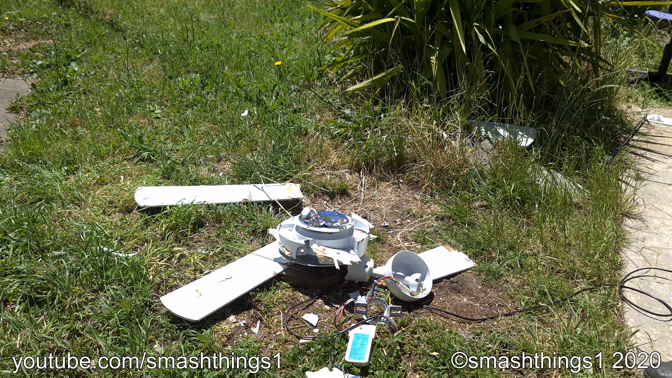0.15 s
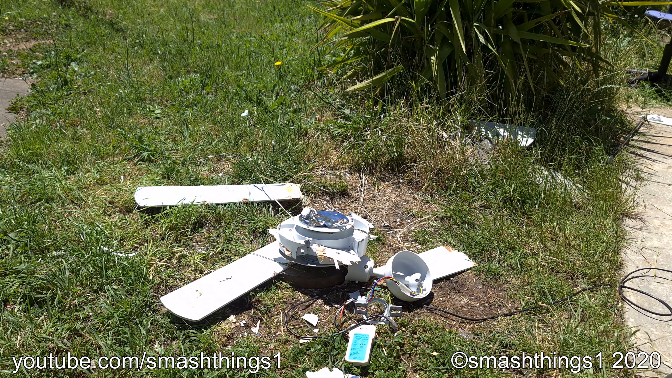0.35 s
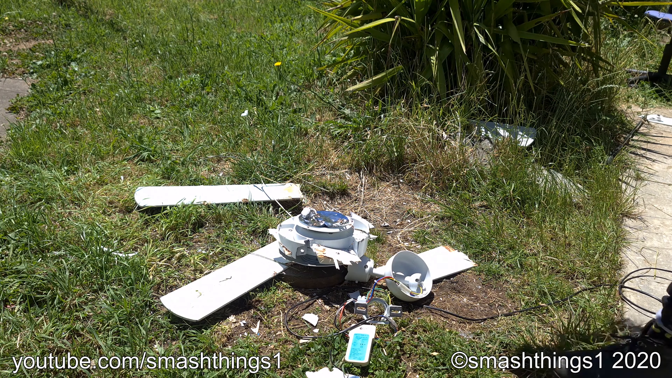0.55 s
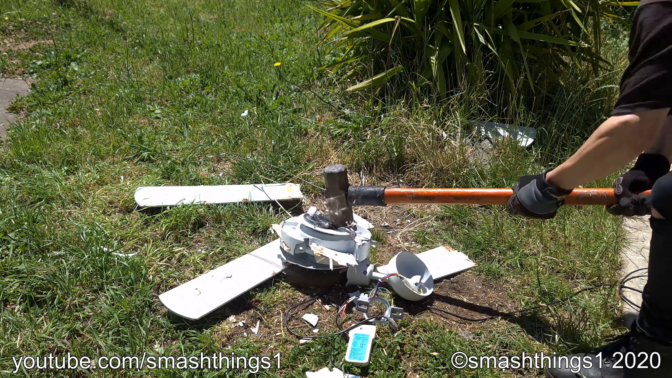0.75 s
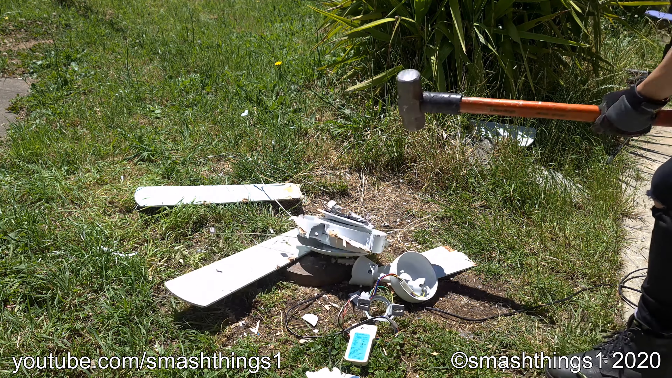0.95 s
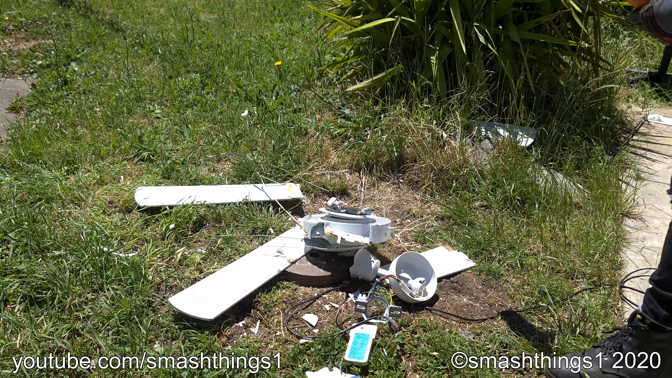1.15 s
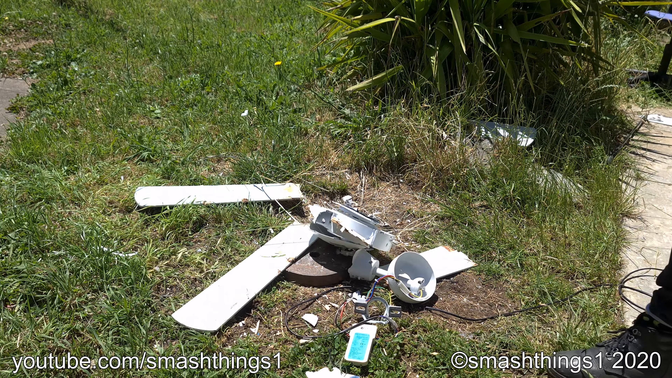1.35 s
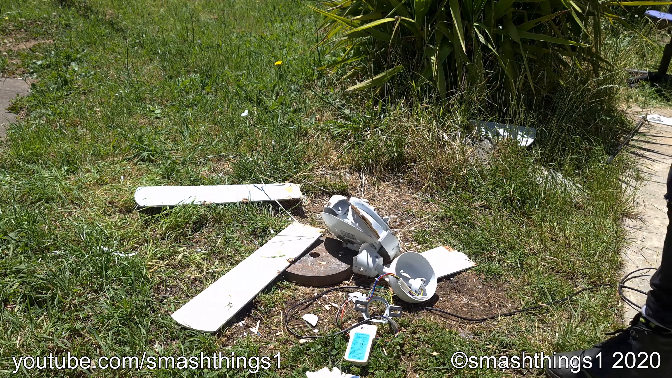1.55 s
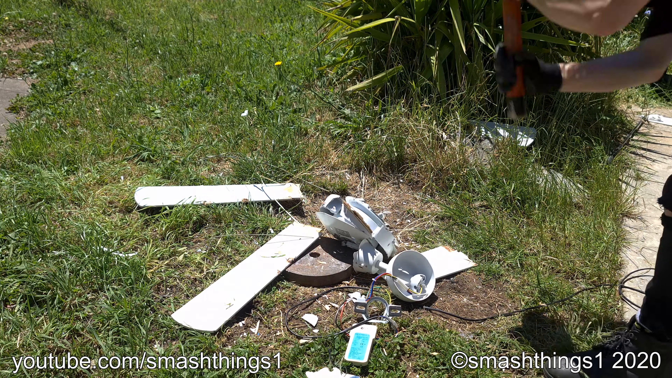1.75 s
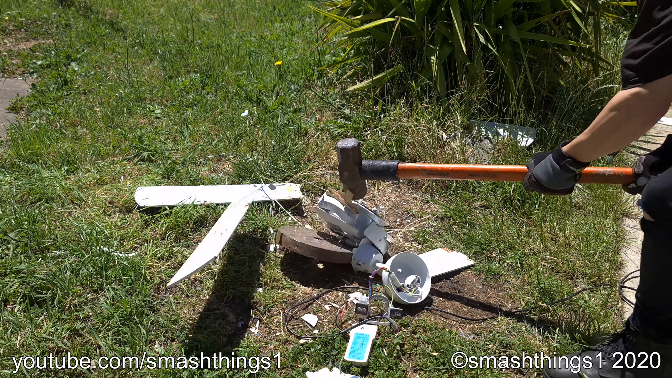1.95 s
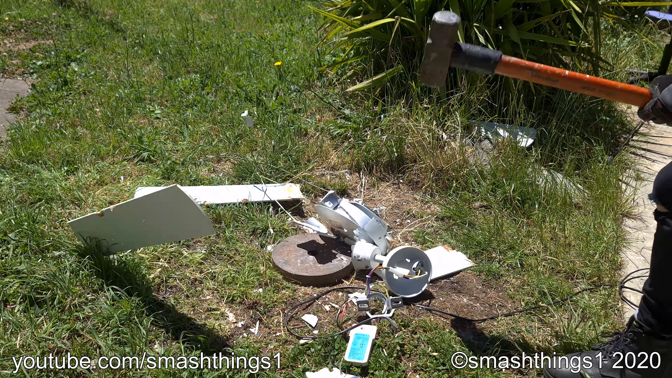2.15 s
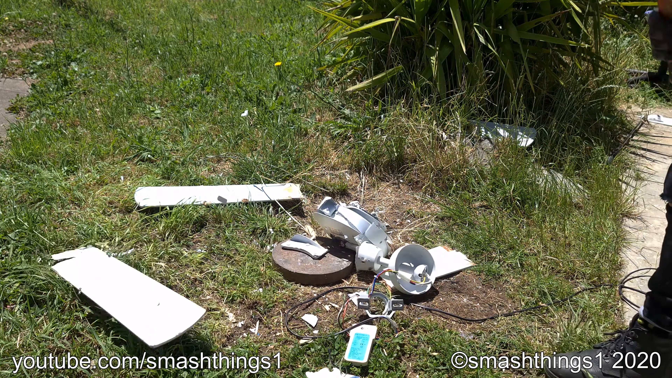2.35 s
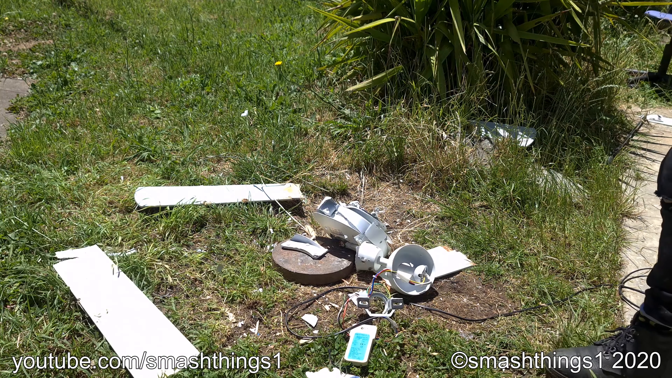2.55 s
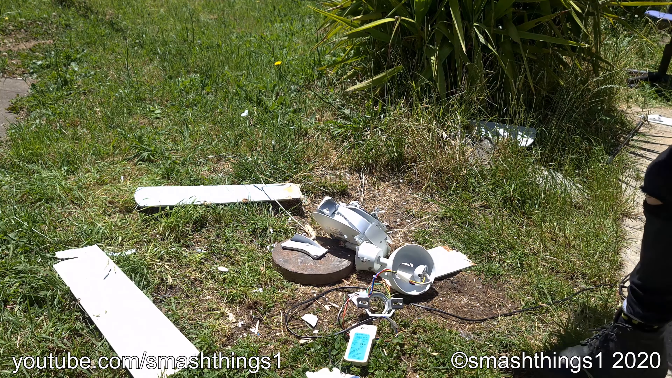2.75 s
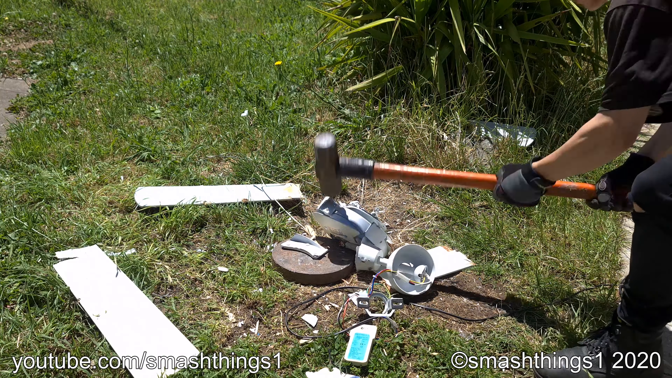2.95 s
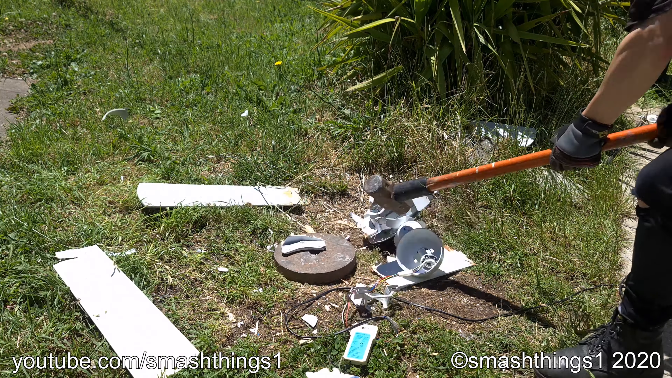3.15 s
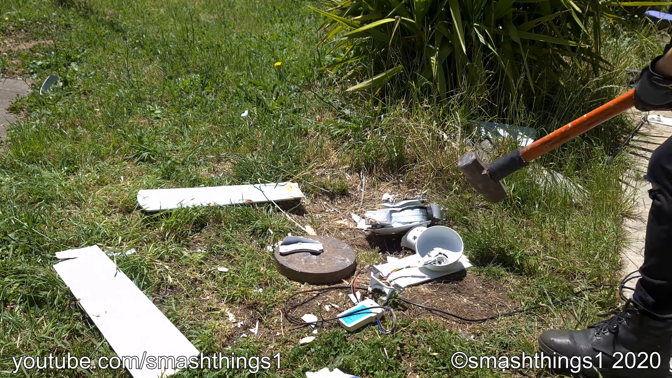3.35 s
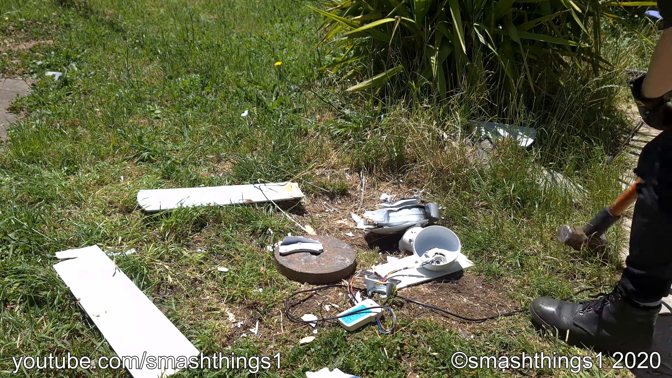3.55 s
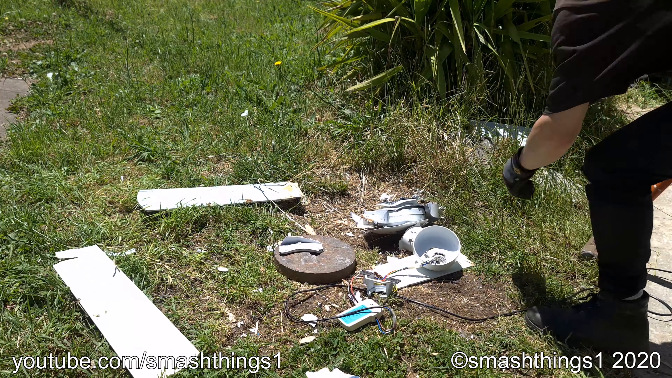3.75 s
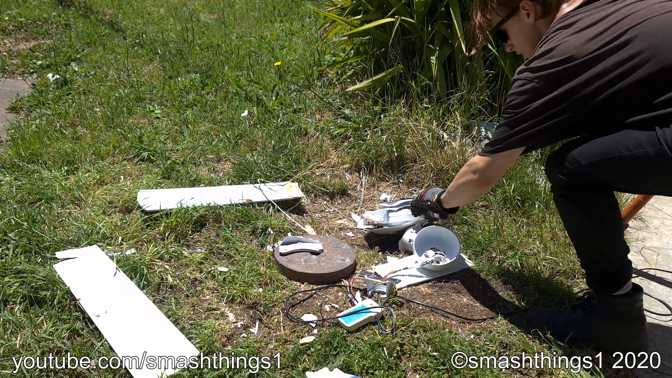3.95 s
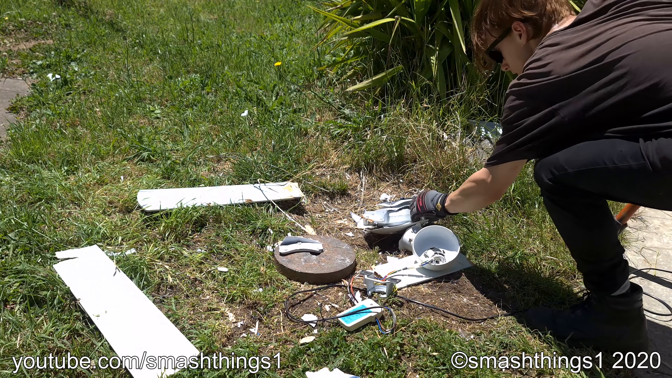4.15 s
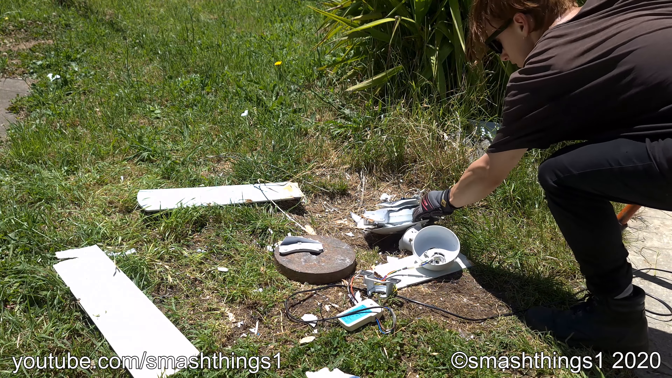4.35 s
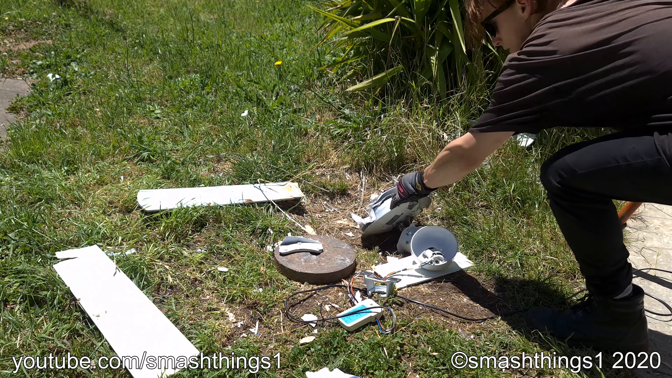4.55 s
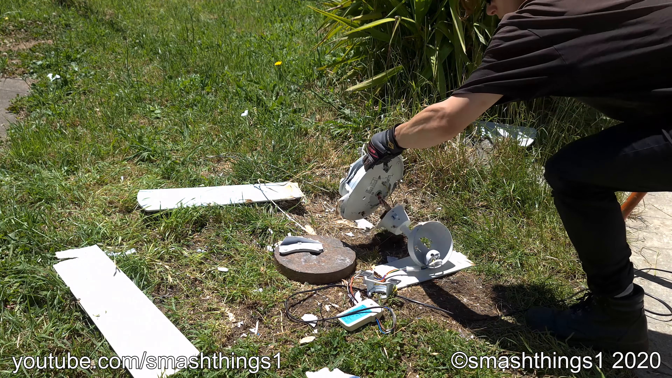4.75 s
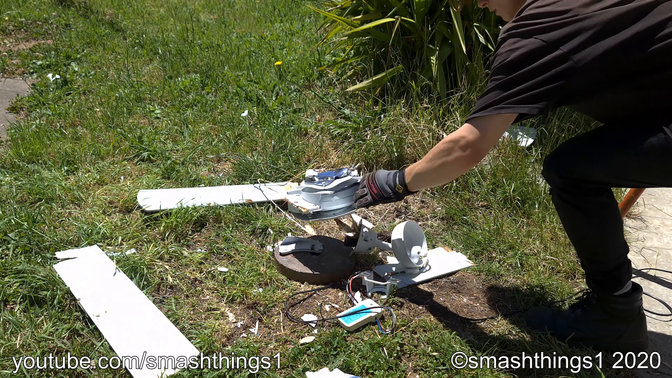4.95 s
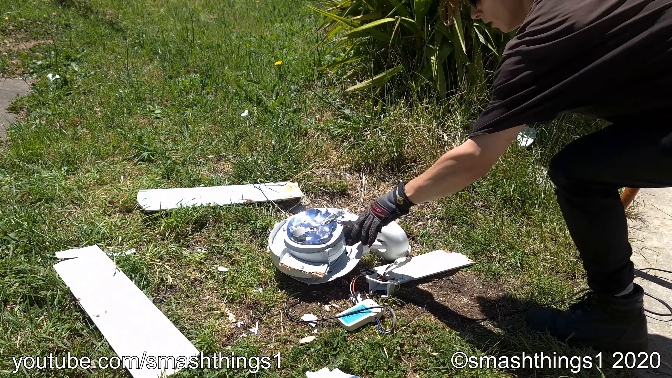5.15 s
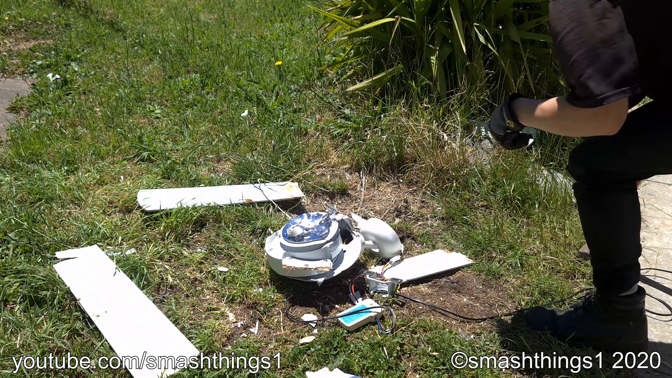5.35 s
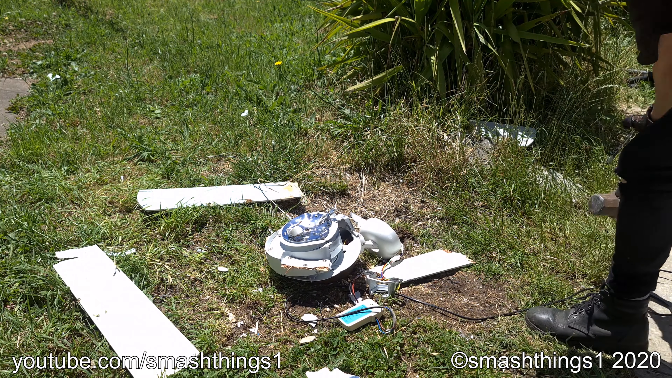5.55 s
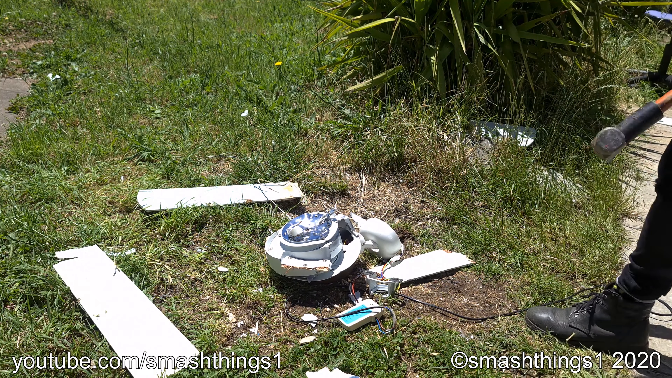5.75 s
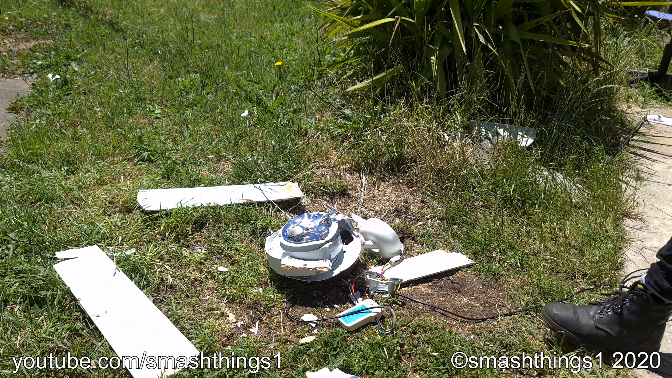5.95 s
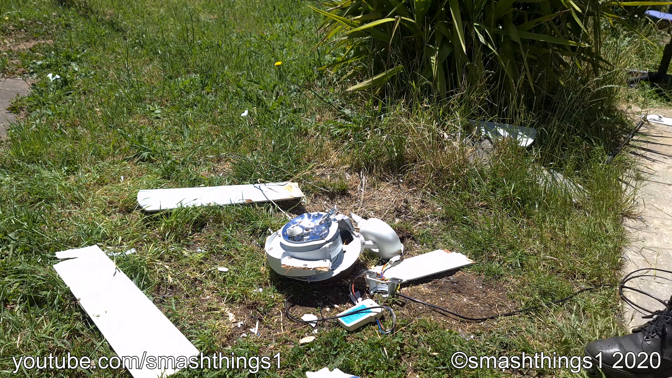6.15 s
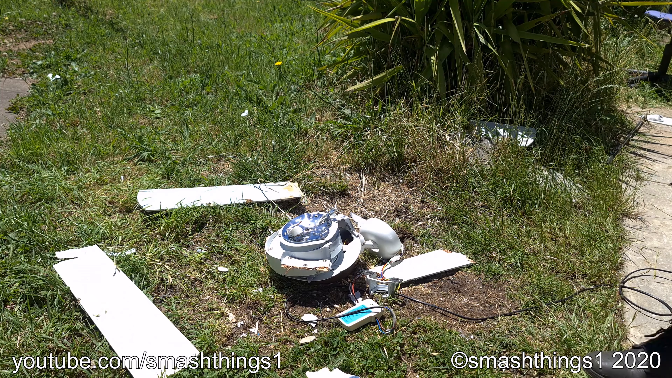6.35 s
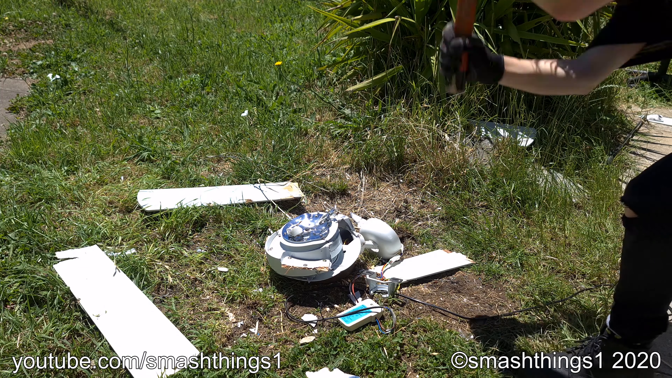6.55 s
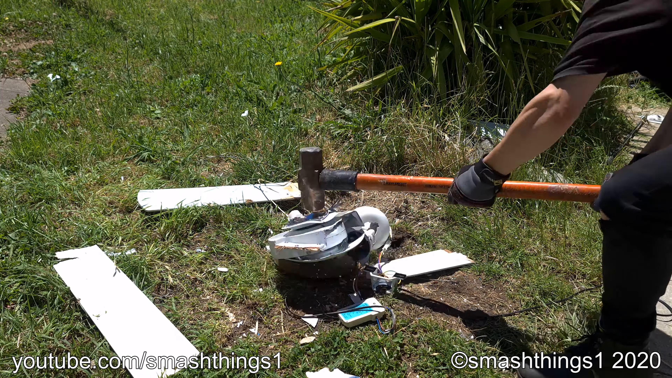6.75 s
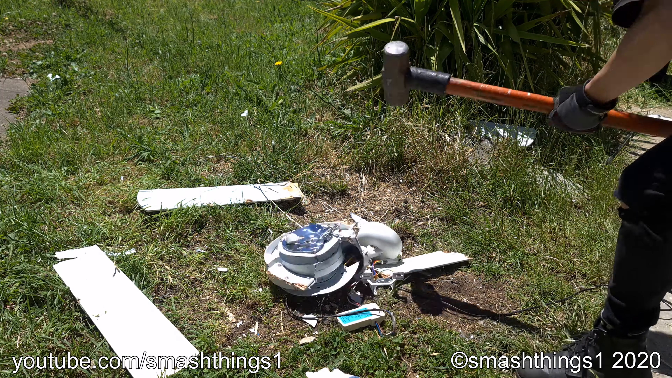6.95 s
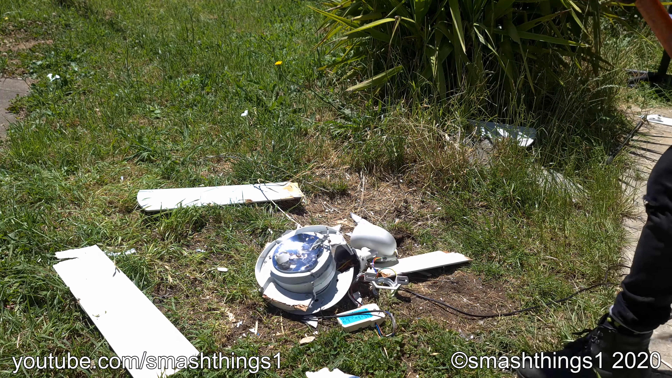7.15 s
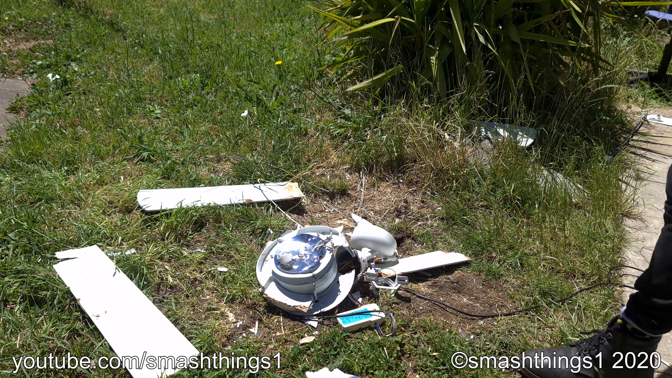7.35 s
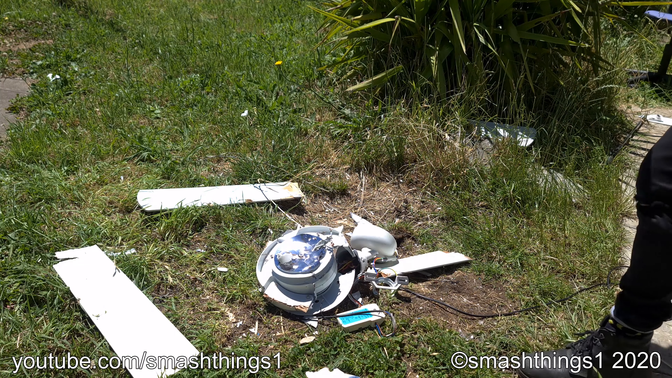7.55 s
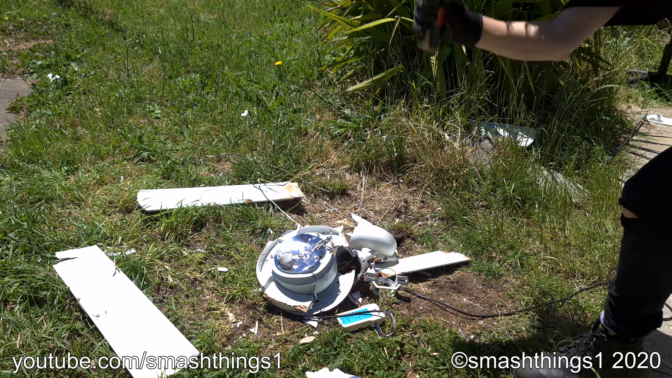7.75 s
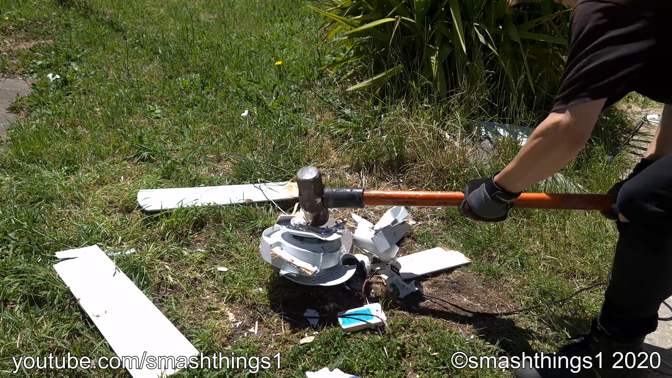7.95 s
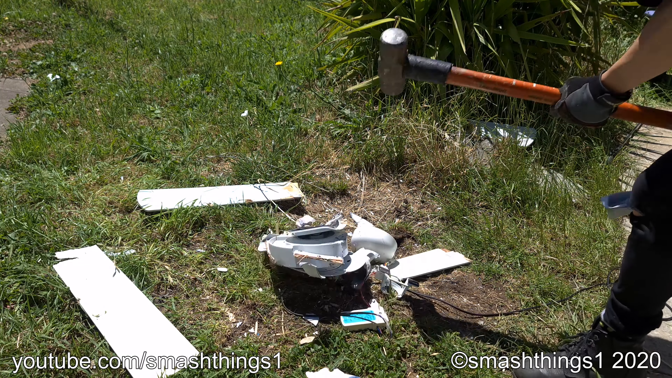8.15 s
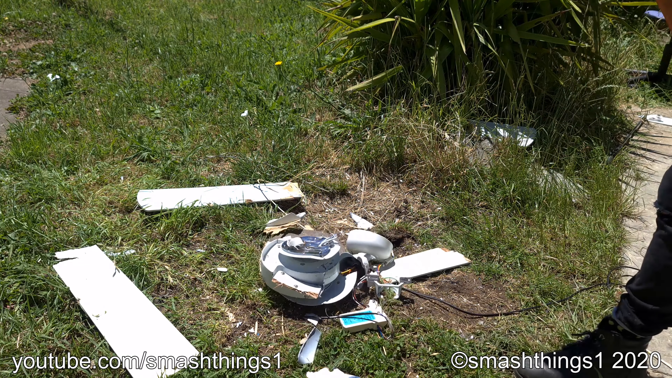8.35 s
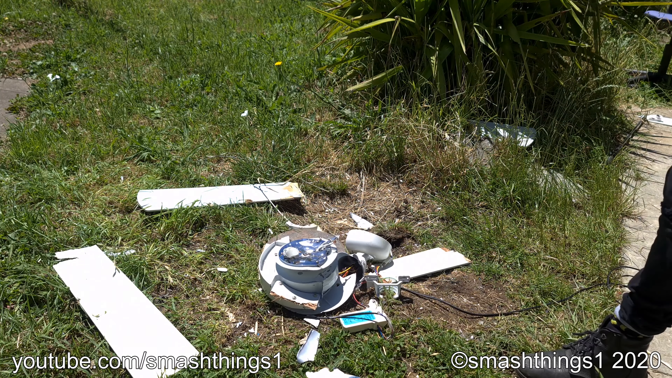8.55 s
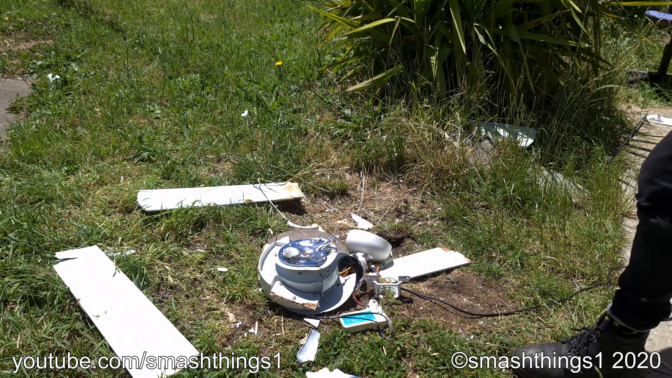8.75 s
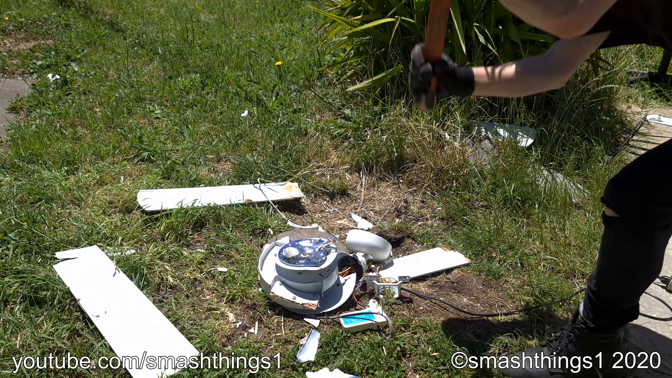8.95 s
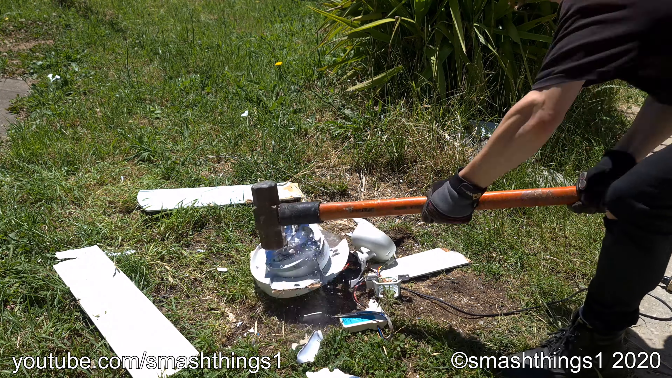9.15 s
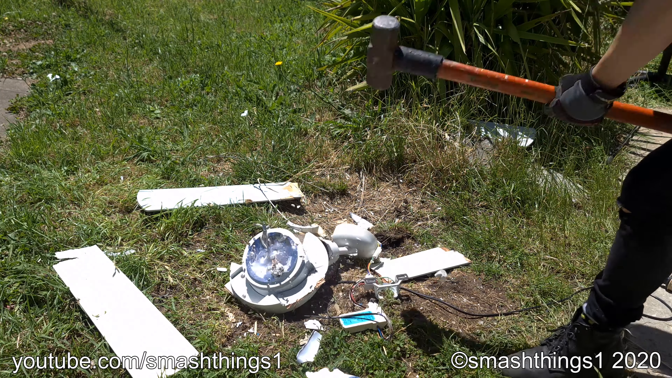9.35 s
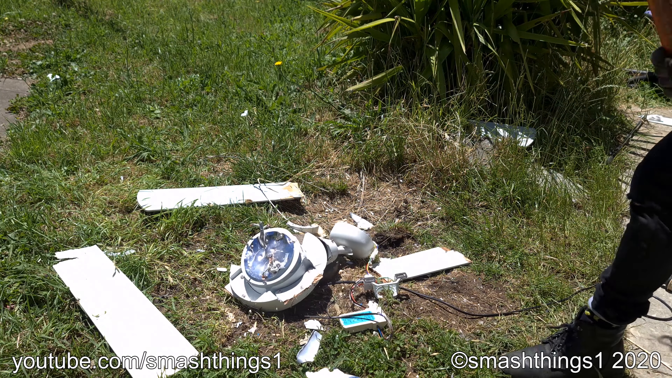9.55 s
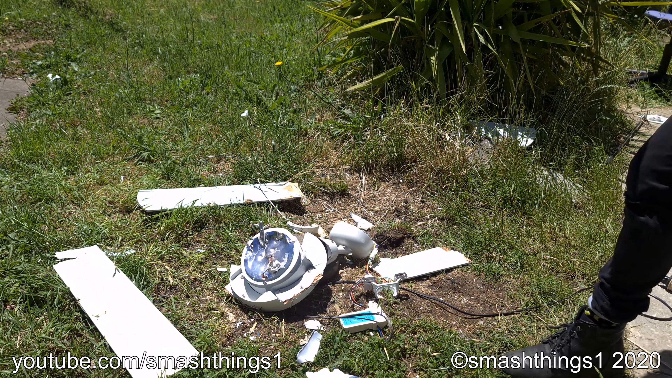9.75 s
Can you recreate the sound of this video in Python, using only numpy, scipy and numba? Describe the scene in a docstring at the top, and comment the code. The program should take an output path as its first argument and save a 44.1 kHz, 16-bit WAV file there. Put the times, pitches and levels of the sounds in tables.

```python
"""Sledgehammer on a fan housing

A sledgehammer smashes a sheet-metal and plastic fan housing on a lawn; a hand sets it back once.
Contacts are noise-band cracks with damped modes; some let the sheet ring on. Loose parts rattle as random
grains; heavy blows add crumpling noise and a ground thud. Soft knocks and rustles are filtered noise.
Shaped noise makes the quiet garden; the camera turns its gain down after loud hits.
"""
import sys
import numpy as np
from scipy import signal
from scipy.fft import rfft, irfft
from scipy.io import wavfile
from numba import njit

SR = 44100
rng = np.random.default_rng(int(sys.argv[2]) if len(sys.argv) > 2 else 0)


def int16_out(signal):
    """Quantize to a 16-bit WAV file."""
    q = np.round(np.clip(np.atleast_2d(signal).T, -1, 1) * 32767)
    wavfile.write(sys.argv[1], SR, q.astype(np.int16))


N = 431738


def undb(db):
    """Amplitude ratio of a level in dB."""
    return 10 ** (np.asarray(db) / 20)


def unit(x):
    """Scale to an RMS of 1."""
    return x / np.sqrt(np.mean(x ** 2))


def fall(t, t60):
    """Exponential decay by 60 dB in t60."""
    return np.exp(-np.log(1000) * t / t60)


def time_s(length_s):
    """Time axis of one event."""
    return np.arange(int(length_s * SR)) / SR


def band(x, lo_hz, hi_hz):
    """Butterworth band-pass."""
    sos = signal.butter(2, [lo_hz, min(hi_hz, .45 * SR)], "band", fs=SR, output="sos")
    return signal.sosfilt(sos, x)


def hiss(lo_hz, hi_hz):
    """Band of noise over the whole scene, RMS 1."""
    return unit(band(rng.standard_normal(N), lo_hz, hi_hz))


def add(out, s, x):
    """Mix x into out from time s, cut at the end."""
    i = int(s * SR)
    out[..., i:i + x.shape[-1]] += x[..., :N - i]


def grains(rate_hz, spread_db, t60):
    """Envelope of random small contacts, a few much stronger than the rest."""
    struck = rng.random(N) < rate_hz / SR
    clicks = struck * undb(spread_db * np.minimum(rng.exponential(size=N), 3))
    return unit(signal.lfilter([1], [1, -fall(1 / SR, t60)], clicks))


# pieces that land to one side: from t/s, to t/s, left minus right level/dB
SIDE_SPANS = [(3.8, 4.4, -4), (8.4, 8.95, -4.5), (9.55, 9.7, -8)]


def placed(s, db):
    """Left and right gain of a contact: level differences pan it."""
    pan_db = sum(side_db * (start <= s < end) for start, end, side_db in SIDE_SPANS)
    return undb(db + np.array([[pan_db], [-pan_db]]) / 2)


GARDEN_DB = -64.5
# background spectrum: f/Hz, relative density/dB per Hz
GARDEN_SPECTRUM = [(21, -34), (35, 3), (240, -2), (410, -6), (1280, -16.5), (2420, -22), (5870, -29)]


def garden():
    """Distant traffic and leaves: shaped noise whose two sides differ more above the bass."""
    f = np.maximum(np.fft.rfftfreq(N, 1 / SR), 1)
    hz, db = np.transpose(GARDEN_SPECTRUM)
    shape = undb(np.interp(np.log(f), np.log(hz), db))
    mid, side = rfft(rng.standard_normal((2, N))) * shape
    side = side * np.clip(f / 900, .1, .6)
    return undb(GARDEN_DB) * unit(irfft([mid + side, mid - side], N))


TICKS_DB = -85
# clothes and grass brushed: centre t/s, half length/s, level/dB
RUSTLES = [(0.087, 0.072, -61.5), (0.575, 0.04, -58.5), (0.725, 0.061, -62), (1.586, 0.04, -62.5),
           (1.685, 0.014, -49), (3.625, 0.028, -63.5), (5.974, 0.065, -67.5), (6.099, 0.044, -60),
           (6.524, 0.069, -61.5), (6.634, 0.041, -62.5), (9.081, 0.047, -64)]


def rustle():
    """Cloth and dry grass swish with a fine crackle; lone faint ticks, dull or bright, throughout."""
    t = np.arange(N) / SR
    swish = sum(undb(db) * np.exp(-((t - s) / half) ** 2) for s, half, db in RUSTLES)
    crackle = 0.95 + grains(270, 4.0, 0.0069)
    brush = unit(crackle * (hiss(600, 6600) + undb(-4.5) * hiss(3500, 17000)))
    ticks = sum(grains(6, 5, .006) * hiss(hz, 3 * hz) for hz in (1500, 3000, 7000))
    return swish * brush + undb(TICKS_DB) * ticks


RATTLE_RISE_S, RATTLE_T60_S = 0.022, 0.27
JOLT_DB, JOLT_T60_S = -20, 0.023  # jolt level re contact
# rattling spells: start t/s, length/s, start level/dB, end level/dB
RATTLE_SPELLS = [(0.792, .14, -44, -42.5), (1.026, 0.08, -42.5, -55), (1.904, 0.46, -43.5, -55),
                 (3.038, 0.43, -34, -58), (4.0, 0.64, -81.5, -66.5), (4.719, 0.17, -44.5, -52),
                 (5.038, 0.024, -30, -29), (5.149, 0.078, -32, -34.5), (5.286, 0.38, -52, -62),
                 (6.725, 0.44, -34.5, -54.5), (7.94, 0.29, -44, -58), (8.281, 0.052, -34, -35.5),
                 (8.438, 0.48, -48.5, -65), (9.1, 0.33, -47, -46.5), (9.524, 0.27, -57, -78)]


def shaking():
    """Loose parts are driven in spells that rise, slide in level and die away; each contact jolts them."""
    out, t = np.zeros(N), time_s(1.2)
    for s, length, start_db, end_db in RATTLE_SPELLS:
        slide = undb(start_db + (end_db - start_db) * np.minimum(t / length, 1))
        rise = np.minimum(t / RATTLE_RISE_S, 1)
        add(out, s, rise * slide * fall(np.maximum(t - length, 0), RATTLE_T60_S))
    for s, level_db, _ in CONTACTS:
        add(out, s, undb(level_db + JOLT_DB) * fall(t, JOLT_T60_S))
    return out


TICK_TILT_DB = 0.96  # per band upwards
KNOCKS_DB, CLINKS_DB = -3.5, -1.0
# housing modes, also used by rings and hits: f/Hz, relative level/dB, nominal t60/s
HOUSING_MODES = [(620, -2, .1), (720, -2, .1), (1440, -5, .15), (1570, -2, .45), (1780, -3, .15),
                 (1920, -3, .2), (2350, -4, .15), (2770, -2, .2), (2970, -5, .15), (3360, 1, .4),
                 (3685, -2, .22), (4150, -2, .3), (4470, -1, .35), (5240, -2, .15), (5350, -1, .15),
                 (5485, -1, .2), (6700, -5, .2), (7400, -4, .15), (7920, -4, .15), (8580, -4, .2),
                 (10150, -6, .12), (11110, -5, .18), (11700, -3, .18), (12700, -5, .15), (13500, -5, .15),
                 (14450, -7, .15)]


def rattle():
    """Dense small contacts: each piece ticks in its band, knocks the plastic and pings single modes."""
    shake = .25 + grains(90, 3.5, .02)
    ticks = 0
    for k, hz in enumerate(1000 * 1.6 ** np.arange(6)):
        piece = shake + 0.96 * grains(45, 3.0, 0.019)
        ticks = ticks + undb(TICK_TILT_DB * k) * piece * hiss(hz, 1.6 * hz)
    plastic = hiss(550, 950) + undb(-6) * hiss(250, 550) + undb(-8) * hiss(1000, 1600)
    knocks = unit(grains(60, 3.0, .045) * plastic)

    # two sets of modes: one barely detuned, one spread
    modes = list(HOUSING_MODES) * 2
    spread_db = np.repeat([.05, .5], len(HOUSING_MODES))
    detune = undb(spread_db * rng.standard_normal(len(modes)))
    clinks = 0
    for (hz, db, t60), shift in zip(modes, detune):
        r = fall(1 / SR, min(.5 * t60, .14))
        resonator = [1, -2 * r * np.cos(2 * np.pi * hz * shift / SR), r * r]
        ping = signal.lfilter([1], resonator, grains(30, 4.0, 0.0002))
        clinks = clinks + undb(db) * unit(ping)
    return shaking() * (unit(ticks) + undb(KNOCKS_DB) * knocks + undb(CLINKS_DB) * unit(clinks))


THUMP_T60_S = 0.067
# boots, plastic and heavy parts knocking on the turf: t/s, f/Hz, level/dB
THUMPS = [(1.2, 796, -43), (1.665, 750, -42), (2.157, 720, -28), (2.31, 770, -26), (3.865, 293, -39.5),
          (4.384, 760, -45), (5.072, 555, -19.5), (5.737, 187, -45), (6.993, 760, -28), (8.311, 700, -31),
          (8.436, 390, -18.5), (8.909, 394, -41), (9.646, 530, -32)]


def thumps():
    """Dull, soft contacts: decaying noise about each pitch, a few cycles long."""
    out, t = np.zeros((2, N)), time_s(.15)
    for s, hz, db in THUMPS:
        knock = unit(band(rng.standard_normal(len(t)), 0.68 * hz, 1.44 * hz))
        add(out, s, placed(s, db) * knock * fall(t, THUMP_T60_S))
    return out


THUD_RISE_S, THUD_T60_S = .009, .085
SHELL_DB, SOIL_DB = -5, -3.0  # re thud tone
SHOVE_S = .06
# hammer blows: t/s, crush level/dB, crush t60/s, thud level/dB,
# microphone shove level/dB, thud f/Hz, shell f/Hz
BLOWS = [(0.769, -13.5, 0.12, -20, -17.5, 116.3, 729), (1.902, -14.5, 0.14, -17.5, -47.5, 124, 615),
         (2.999, -9.5, 0.13, -22, -33, 129, 722), (6.713, -26.5, 0.23, -18, -19.5, 117.1, 621),
         (7.929, -14.5, 0.14, -17, -40, 112.7, 710), (9.108, -12.5, 0.073, -23.5, -39, 107, 724)]


def blows():
    """Sheet crumples, the shell booms, the ground thud swells a moment later, air shoves the microphone."""
    out, t = np.zeros(N), time_s(.4)
    sheet = hiss(450, 1000) * undb(-5.5) + hiss(820, 6400)
    sheet = sheet + hiss(3300, 4200) * undb(-3.5) + hiss(6200, 12000) * undb(2.5)
    crumple = unit(sheet * (1.6 + grains(400, 1.1, 0.0052)))
    soil = hiss(65, 420)
    swell = 3 * fall(t, THUD_T60_S) * (1 - np.exp(-(t / THUD_RISE_S) ** 2))
    shove = np.sin(np.pi * np.minimum(t / SHOVE_S, 1)) ** 2
    for s, crush_db, crush_t60, thud_db, shove_db, thud_hz, shell_hz in BLOWS:
        i = int(s * SR)
        crush = crumple[i:i + len(t)] * fall(np.maximum(t - .01, 0), crush_t60)  # 10 ms hold
        thud = np.sin(2 * np.pi * thud_hz * t) + undb(SOIL_DB) * soil[i:i + len(t)]
        thud = thud + undb(SHELL_DB) * np.sin(2 * np.pi * shell_hz * t)
        add(out, s, undb(crush_db) * crush + undb(thud_db) * swell * thud - undb(shove_db) * shove)
    return out


CHOKE_T60_S, RING_ATTACK_S = .09, 0.00089
BEAT_DEPTH, BEAT_SPREAD_HZ = .6, 14
# contacts that leave the metal free: t/s, level/dB, free ringing/s, ringing f/Hz (one or more)
RINGS = [(.8, -33, .045, 3685, 4140), (1.93, -27, .03, 5230, 3690, 7520), (2.01, -36, .04, 3695, 4100),
         (2.1, -40, .03, 3685, 5455), (2.231, -36, .012, 4525, 5450, 10680),
         (2.286, -33, .02, 11600, 8680, 5380, 13500), (3.04, -33, .07, 3365, 4140),
         (3.112, -30, .02, 5330, 4470, 8600), (3.16, -32, .06, 5470, 3650, 3365, 12700, 7920),
         (3.293, -36, .045, 8560, 5230, 11900, 3685), (3.335, -43, .01, 11600, 8600), (3.3, -42, .15, 1570),
         (4.672, -38, .02, 4500), (4.74, -36, .03, 6690), (4.705, -31, .025, 1425, 4330, 5015),
         (4.76, -37, .03, 3815, 5500), (5.18, -34, .065, 2777), (5.295, -40, .12, 4470, 5490, 6690),
         (5.52, -55, .07, 4710, 1560), (5.59, -53, .08, 5500, 4480), (6.745, -30, .02, 5470),
         (6.805, -31, .065, 3365, 4140), (6.875, -35, .085, 4190, 1570, 7880),
         (6.89, -39, .01, 11600, 13500), (7.02, -36, .03, 5240, 5475, 4100), (7.1, -46, .14, 1570),
         (7.165, -47, .02, 7240, 11200), (7.96, -36, .07, 4420), (8.577, -44, .05, 1920, 2350),
         (8.636, -43, .09, 1570, 1920), (9.4, -49, .12, 3365, 1570)]


def rings():
    """Bent sheet shifts its nearest modes to named pitches; they throb until grass or hand chokes them."""
    out, t = np.zeros((2, N)), time_s(.3)
    hz, db, t60 = np.transpose(HOUSING_MODES)[:, :, None]
    lucks = rng.standard_normal((len(RINGS), 3, len(hz), 1))
    for (s, level_db, free, *named), luck in zip(RINGS, lucks):
        pitch = hz * undb(.2 * luck[1])
        share_db = db - 17 + 6 * luck[0]  # the other modes: faint
        nearest = abs(np.log(hz / named)).argmin(axis=0)
        pitch[nearest, 0] = named
        share_db[nearest] = db[nearest] + 1 - 2.5 * np.arange(len(named))[:, None]  # favours first named
        throb = 1 + BEAT_DEPTH * np.cos(2 * np.pi * BEAT_SPREAD_HZ * luck[0] * t + luck[1])
        tone = np.sin(2 * np.pi * pitch * t + 2 * luck[2])
        ring = (undb(share_db) * fall(t, t60 + free) * throb * tone).sum(axis=0)
        choke = fall(np.maximum(t - free, 0), CHOKE_T60_S)
        attack = 1 - np.exp(-t / RING_ATTACK_S)
        add(out, s, ring * choke * attack * placed(s, level_db))
    return out


BASS_DB, BASS_PER_TREBLE = -11, -0.39  # duller contacts knock lower
CLANK_DB = -14.0
# contacts that stand out: t/s, crack level/dB, relative treble level/dB
CONTACTS = [(0.3685, -59.5, 4.5), (0.7699, -13, -26.5), (0.8738, -32.5, -37), (0.8941, -30.5, -37),
            (1.022, -35.5, -33), (1.0581, -32.5, -34), (1.0926, -38, -38), (1.2458, -57, -13),
            (1.66, -38.5, 4), (1.904, -11.5, -5.5), (1.953, -29, 14), (2.0316, -38, -54),
            (2.096, -30.5, 0.5), (2.1268, -29, 6), (2.1565, -33, -56), (2.23, -32.5, 17.5),
            (2.2859, -33, 15), (2.3108, -29, -39), (2.4526, -42, -15), (2.7928, -50, -14.5),
            (2.9963, -15, -1.5), (3.0336, -19.5, 5), (3.0863, -29, 2), (3.1104, -20, -6),
            (3.1588, -25.5, 4.5), (3.218, -29, -19), (3.2926, -28, -2), (3.335, -58, 18),
            (3.3743, -42.5, -2), (3.6128, -47, -1), (4.3846, -47.5, -14), (4.555, -51, -18),
            (4.604, -48.5, -11), (4.6716, -43.5, -58), (4.6939, -29, 5), (4.7045, -19, 3),
            (4.7352, -31.5, 8), (4.7457, -27, 8.5), (4.764, -36.5, 0), (4.8363, -32, 8.5),
            (4.9876, -27.5, 0.5), (5.038, -21, 4), (5.063, -19, 0), (5.0742, -12, 4.5), (5.08, -16, 3),
            (5.1429, -22, 1.5), (5.252, -28, -3.5), (5.2972, -34.5, 9.5), (5.3607, -36.5, -2),
            (5.4211, -39, -5), (5.519, -47, -16), (5.5933, -43, -44), (5.7049, -54, -44), (6.354, -61.5, 9),
            (6.7109, -5, -3), (6.815, -37, 8), (6.8553, -25, 5.5), (6.9228, -33, -31), (6.9595, -29, -14),
            (6.992, -28.5, 1), (7.1139, -42, -39.5), (7.167, -45.5, -6), (7.2436, -48.5, -34),
            (7.9301, -10, -0.5), (8.0679, -38.5, 7.5), (8.1664, -33.5, -8), (8.1856, -27, 11.5),
            (8.201, -12.5, -2), (8.2629, -25, -1), (8.423, -16.5, -7), (8.4349, -15, -6),
            (8.5784, -35, -32), (8.6362, -32.5, -8), (8.6632, -35.5, -4), (8.7265, -26, -12),
            (8.927, -45, -21), (9.1095, -13, -20), (9.2219, -34, -15), (9.277, -28, -6),
            (9.3152, -27.5, -7), (9.491, -46.5, 16), (9.5699, -32.5, -32), (9.633, -41.5, 7),
            (9.7318, -37, 6)]


def hits():
    """A crack in four bands and a short clank: the held or lying sheet damps and shifts its modes."""
    out, t = np.zeros((2, N)), time_s(.2)
    bass = hiss(610, 820) + undb(-8) * hiss(400, 800)
    low, middle, treble = hiss(1000, 2200), hiss(3200, 6800), hiss(6000, 26000)
    hz, db, _ = np.transpose(HOUSING_MODES)[:, :, None]
    lucks = rng.standard_normal((len(CONTACTS), 3, len(hz), 1))
    for (s, level_db, treble_db), luck in zip(CONTACTS, lucks):
        i = min(int(s * SR), N - len(t))
        part = slice(i, i + len(t))
        t60 = 0.089 * undb(0.24 * (level_db + 13.0))  # harder contacts last longer

        crack = middle[part] + undb(-5.0 - 0.13 * treble_db) * low[part]
        crack = crack + undb(treble_db + 2.5) * fall(t, t60) * treble[part]  # treble dies first
        bass_gain = undb(BASS_DB + BASS_PER_TREBLE * treble_db)
        crack = fall(t, t60) * crack + bass_gain * fall(t, 0.74 * t60) * bass[part]

        mode_db = db + 6.0 * luck[0] * (hz > 1000) + min(treble_db, 0) * (hz > 6000)
        modes = np.sin(2 * np.pi * hz * undb(.3 * luck[1]) * t + 2 * luck[2])
        clank = (undb(mode_db) * modes).sum(axis=0) * fall(t, min(1.6 * t60, .09))

        attack = 1 - np.exp(-t / (0.006 * t60))
        punch = 0.66 + 0.95 * fall(t, 0.18 * t60)
        add(out, s, attack * punch * (crack + undb(CLANK_DB) * clank) * placed(s, level_db))
    return out


def echoes(x, t60, level_db, lo_hz, hi_hz):
    """Scattered short echoes from ground, fence and shrubs: decaying noise, different at each side."""
    t = time_s(.25)
    tails = band(rng.standard_normal((2, len(t))), lo_hz, hi_hz) * fall(t, t60)
    tails = unit(tails) / np.sqrt(len(t))
    return undb(level_db) * signal.fftconvolve(x[None], tails, axes=1)[:, :N]


def scene():
    """Near sources, their echoes, and the background."""
    near = hits() + rings() + blows() + rattle() + thumps()
    mid = near.mean(axis=0)
    bright_echo = echoes(mid, 0.075, -27.5, 970, 13000)
    dull_echo = echoes(mid, 0.16, -16, 260, 4900)
    return near + bright_echo + dull_echo + rustle() + garden()


@njit
def duck(x, top, slope, attack, hold, release):
    """Gain that drops fast above top, holds (samples), then creeps back; rates are per sample."""
    gain, e, wait = np.empty(len(x)), 0., 0.
    for i in range(len(x)):
        if x[i] > e:
            e, wait = e + (x[i] - e) * attack, hold
        elif wait > 0:
            wait -= 1
        else:
            e -= e * release
        gain[i] = (top / max(e, top)) ** slope
    return gain


DUCK_TOP_DB, DUCK_SLOPE = -32.5, 0.25
ATTACK_S, HOLD_S, RELEASE_S = 0.0056, .35, .3
COUPLING_HZ, TOP_HZ = 1.1, 15700


def record(dry):
    """Gain control, rounded peaks, four coupling capacitors that swing slowly after a shove, top cut."""
    loudest = abs(dry).max(axis=0)
    gain = duck(loudest, undb(DUCK_TOP_DB) * 1., DUCK_SLOPE,
                1 / (ATTACK_S * SR), HOLD_S * SR, 1 / (RELEASE_S * SR))
    x = np.tanh(1.678 * dry * gain) / 2.484
    pole = np.exp(-2 * np.pi * COUPLING_HZ / SR)
    capacitors = np.tile([1, -1, 0, 1, -pole, 0], (4, 1)).astype(float)
    x = signal.sosfilt(capacitors, x)
    return signal.sosfilt(signal.ellip(10, .2, 80, TOP_HZ, fs=SR, output="sos"), x)


dry = scene()
out = record(dry)
int16_out(out)
```